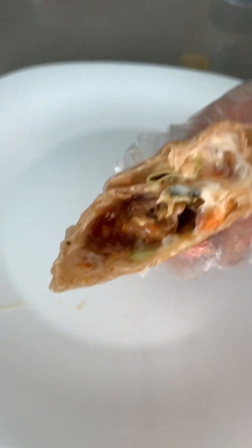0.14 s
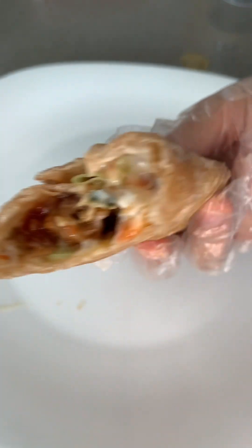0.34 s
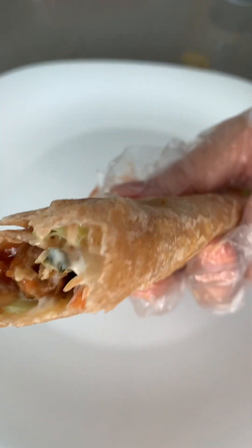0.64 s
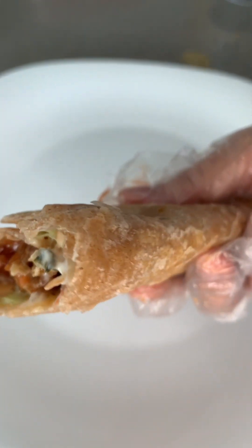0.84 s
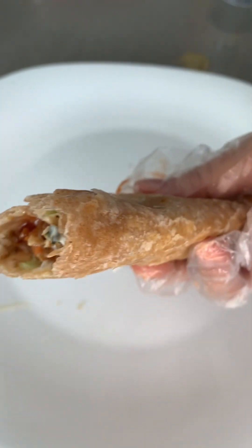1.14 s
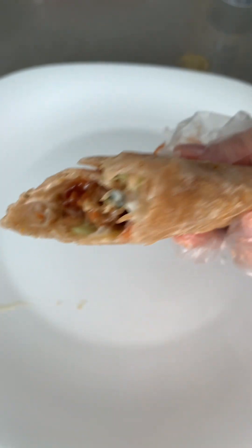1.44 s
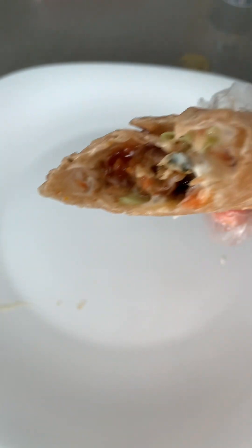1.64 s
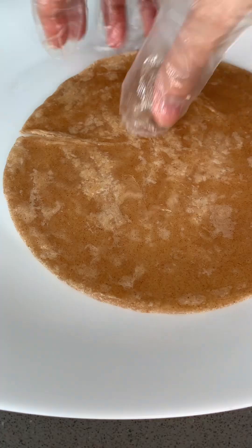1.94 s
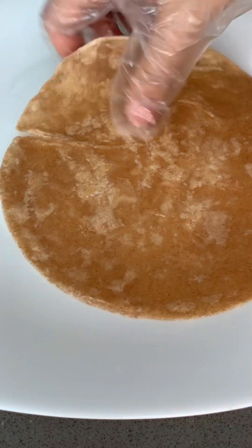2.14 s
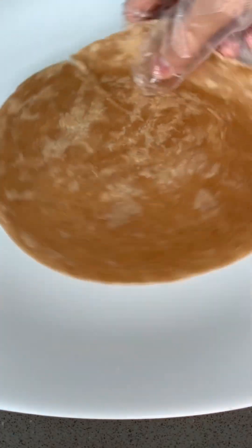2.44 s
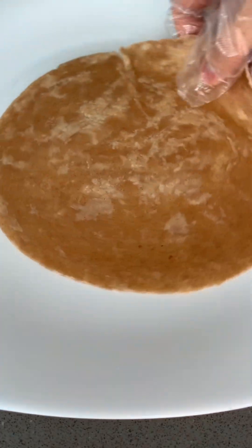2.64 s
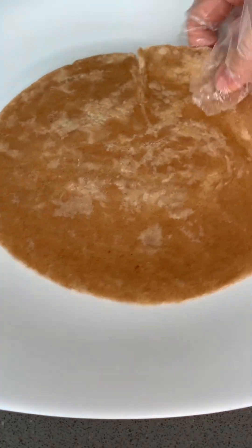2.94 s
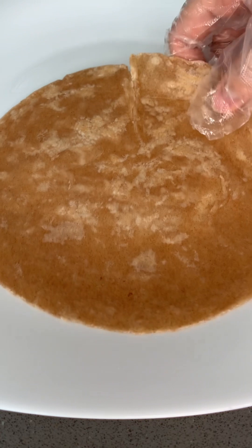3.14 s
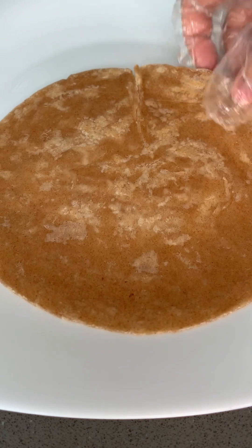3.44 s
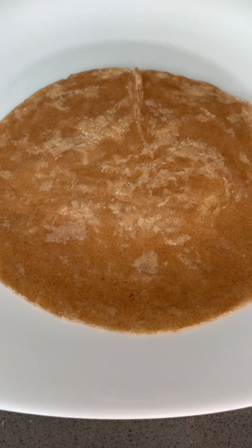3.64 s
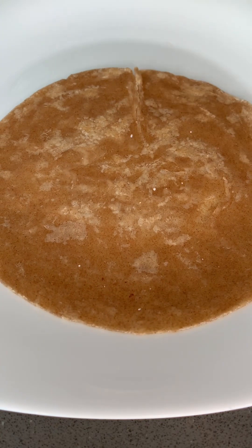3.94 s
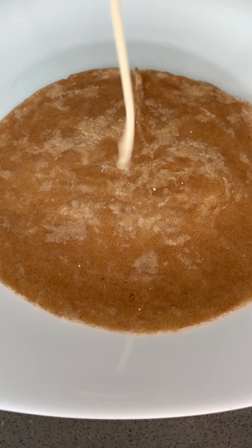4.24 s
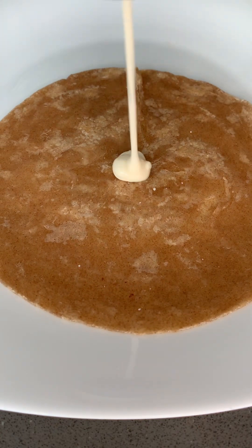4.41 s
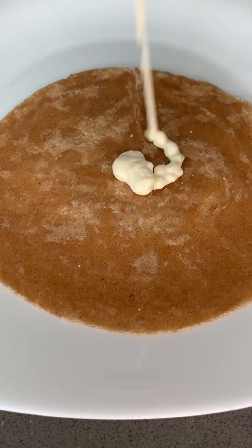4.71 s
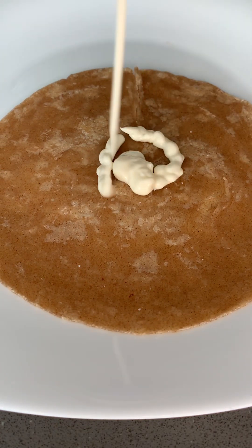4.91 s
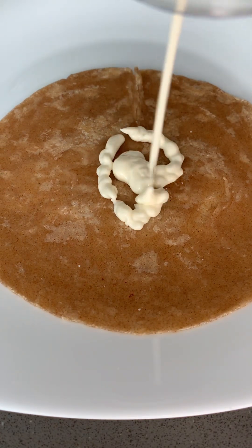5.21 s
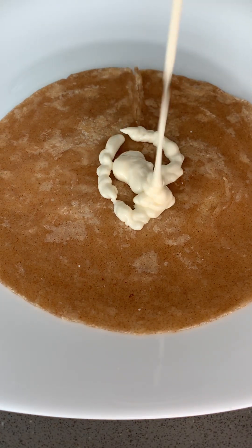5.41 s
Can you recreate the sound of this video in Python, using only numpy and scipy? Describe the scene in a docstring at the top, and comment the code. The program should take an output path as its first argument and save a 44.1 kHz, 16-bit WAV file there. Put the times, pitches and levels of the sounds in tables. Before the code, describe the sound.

Close, dry kitchen recording from above. Thin plastic gloves crackle sharply around a wrap, ease off, then rustle much louder as a flatbread is slid and turned on a plate. A squeeze-bottle cap creaks and pops with a hollow click. Only small sparse crackles remain while sauce pours, until a very short airy squeak from the nozzle. A faint fridge hum and whine lie beneath.

```python
"""Thin plastic gloves rustle and snap while hands turn a wrap, slide a flatbread and squeeze a sauce bottle.
Film is noise of slowly varying level; each crease that gives way is a short burst of coloured noise.
Fingertips bump; a cap creaks and pops as knocks, ringing modes and a gliding tone; a nozzle squeaks at last.
A fridge adds wandering sines and the quiet kitchen adds noise; decaying noise forms the echo.
A phone with two microphone ports listens from above."""
import sys
import numpy as np
from scipy import signal
from scipy.fft import rfft, irfft, next_fast_len
from scipy.io import wavfile
from scipy.ndimage import uniform_filter1d, map_coordinates

SR = 44100
rng = np.random.default_rng(int(sys.argv[2]) if len(sys.argv) > 2 else 0)


def log_audio(samples):
    """Write samples as a 16-bit WAV file to the path given in sys.argv[1]."""
    # one column per channel
    frames = np.atleast_2d(samples).T
    # limit to full scale, then quantise
    limited = np.clip(frames, -1, 1)
    pcm = np.round(limited * 32767).astype(np.int16)
    wavfile.write(sys.argv[1], SR, pcm)


N = 245637

# Colour of crackling glove film: [f/Hz, relative spectral level/dB]
FILM_COLOUR = [(2000, -30), (3500, -11), (4800, -4), (6600, -2), (8300, -1), (9600, 0), (11000, -2),
               (13500, -3), (15500, -2), (17000, -6)]
# Catches of the cap: [t/s, relative level/dB, crack relative to knock/dB]
CAP_CATCHES = [(3.7847, -17.5, -16.5), (3.789, -24.5, -15), (3.7991, -15, -16), (3.81, -32, -7)]


def amp(db):
    """Amplitude is a power of ten of level: 20 dB is a factor of ten."""
    return 10 ** (np.asarray(db) / 20)


def unit(x):
    """Normalization: each signal is scaled to rms 1 along time."""
    return x / np.sqrt(np.mean(x ** 2, -1, keepdims=True) + 1e-20)


def along(points, hz):
    """Interpolation of (f/Hz, value) points on a logarithmic frequency axis."""
    f, v = np.transpose(points)
    return np.interp(np.log(hz + 1), np.log(f + 1), v)


def curves(rows):
    """Linear interpolation in time: one value per sample for each column after t/s."""
    s, *cols = np.transpose(rows)
    return [np.interp(np.arange(N) / SR, s, c) for c in cols]


def wobble(rate):
    """Slow random modulation: a smooth curve through random knots, rate of them a second."""
    knots = rng.standard_normal(int(N * rate / SR) + 4)
    return map_coordinates(knots, [np.arange(N) * rate / SR])


def filtered(x, response):
    """Linear filtering: the spectrum of x is multiplied by a response of frequency."""
    m = next_fast_len(N + SR // 2)
    return irfft(rfft(x, m) * response(np.fft.rfftfreq(m, 1 / SR)), m)[..., :N]


def rush(spectrum, patchy_db):
    """Partial coherence: two noises of one colour and drifting patches share a part set by frequency."""
    # Likeness of the two ports for a spread source: [f/Hz, correlation]
    likeness = [(60, 0.89), (150, 0.84), (300, 0.94), (700, 0.12), (1400, 0.38), (3000, 1), (5000, 1),
                (15000, 1)]
    z = signal.stft(rng.standard_normal((2, N)), nperseg=256)[2]
    field = uniform_filter1d(rng.standard_normal(z.shape[1:]), size=4, axis=0)
    field = uniform_filter1d(field, size=7, axis=1)
    pair = signal.istft(z * amp(patchy_db * field / field.std()), nperseg=256)[1][:, :N]

    def mid_side(hz):
        angle = np.arccos(np.clip(along(likeness, hz), -1, 1)) / 2
        return amp(along(spectrum, hz)) * [np.cos(angle), np.sin(angle)]
    mid, side = filtered(pair, mid_side)
    return unit(np.array([mid + side, mid - side]))


def bursts(s, db, colour_db, width, size=512):
    """Transient noise: coloured puffs, one row each, swell to a peak at s and die exponentially."""
    t = (np.arange(size) - size // 4) / SR / np.reshape(width, (-1, 1))
    shape = np.exp(np.minimum(3.56 * t, -4 * t))
    colour = amp(colour_db(np.fft.rfftfreq(size, 1 / SR)))
    puffs = shape * irfft(rfft(rng.standard_normal((len(s), size))) * colour)
    rows = amp(db)[:, None] * unit(puffs) * np.sqrt(np.mean(shape ** 2, -1, keepdims=True))
    at = np.round(s * SR).astype(int)[:, None] + np.arange(size)
    return np.bincount(at.ravel(), rows.ravel(), N + size)[size // 4:][:N]


def tones(lines, drift, waver_db):
    """Narrow-band oscillation: sines whose phase and strength wander."""
    t = np.arange(N) / SR
    out = 0
    for hz, db in lines:
        strength = amp(db + 2 + waver_db * wobble(6.4))
        out = out + strength * np.sin(2 * np.pi * hz * t + drift * wobble(5.1))
    return out


def kitchen():
    """Superposition: broadband room air, a faint high hiss, and the narrow-band hum and whine of a fridge."""
    # Background levels: [t/s, relative rumble level/dB, relative whine level/dB]
    levels = [(0.0, -57, -84), (0.15, -58.5, -64), (0.54, -59.5, -84), (0.81, -61.5, -65.5),
              (1.24, -61.5, -71.5), (1.57, -58, -62), (1.83, -61.5, -64), (2.02, -51.5, -55),
              (2.14, -58, -57.5), (2.51, -59, -57), (2.98, -61, -60), (3.58, -61.5, -59),
              (3.95, -55.5, -55.5), (4.58, -62, -60.5), (5.57, -60.5, -56.5)]
    # Colour of the room air: [f/Hz, relative spectral level/dB]
    air_colour = [(20, -42), (32, -35), (50, -2), (90, -11), (260, -1), (450, -7.5), (800, -15.5),
                  (1250, -11), (1700, -23.5), (2600, -62)]
    # Colour of a faint high hiss: [f/Hz, relative spectral level/dB]
    hiss_colour = [(1500, -32), (2200, -1), (3000, -10), (5500, 2.5), (8000, -17), (16500, -7)]
    # Compressor lines: [f/Hz, relative level/dB]
    compressor = [(60, -80), (118.4, -71), (188.4, -69.5), (236.5, -67), (279.9, -69.5), (376.8, -75)]
    # Fan motor lines: [f/Hz, relative level/dB]
    fan = [(1184, -12), (1244, -24), (1303.5, -3.5)]
    rumble_db, whine_db = curves(levels)
    air = amp(rumble_db - 0.8 + 0.55 * np.tanh(wobble(6.4))) * rush(air_colour, patchy_db=1.94)
    # a faint high hiss of unsteady level
    high_hiss = amp(-76.5 + 3.8 * np.tanh(2 * wobble(22))) * rush(hiss_colour, patchy_db=2.0)
    hum = tones(compressor, drift=1.51, waver_db=2.0)
    whine = amp(whine_db - 4.5) * tones(fan, drift=0.9, waver_db=2.7)
    return air + high_hiss + hum + whine


def walls(x, stretch):
    """Reverberation: noise dies at a speed set by frequency, independently at each port; stretch prolongs it."""
    # Reverberation at stretch 1: [f/Hz, t60/s]
    decay = [(200, 0.31), (2000, 0.1), (10000, 0.004)]
    hz, t, z = signal.stft(rng.standard_normal((2, SR // 2)), SR, nperseg=256)
    t60 = stretch * along(decay, hz)[:, None]
    tail = signal.istft(z * amp(-60 * t / t60), SR, nperseg=256)[1]
    return signal.fftconvolve(np.atleast_2d(x), tail / np.linalg.norm(tail[0]), axes=1)[:, :N]


def taps():
    """Soft impact excites a limited band: fingers bump bread and plate, the popping cap jolts the counter."""
    # Finger bumps: [t/s, relative level/dB, centre f/Hz]
    bump_rows = [(0.279, -51, 514), (0.32, -48, 960), (0.455, -54, 3500), (0.468, -54, 3400),
                 (0.921, -57.5, 2000), (0.776, -58.5, 988), (1, -53.5, 455), (1.104, -50, 1900),
                 (1.392, -46.5, 1300), (1.873, -48, 1340), (1.951, -50, 764), (1.977, -38.5, 1320),
                 (2.098, -45.5, 1340), (2.153, -48, 1300), (2.463, -47, 1350), (2.541, -53, 1310),
                 (3.059, -56, 1370), (3.694, -65, 1400), (3.998, -48, 1780), (4.033, -51, 2400),
                 (4.172, -55, 2300), (5.187, -48, 1640)]
    s, db, centre_hz = np.transpose(bump_rows)
    bump_colour = lambda hz: -9 * np.log2((hz + 50) / centre_hz[:, None]) ** 2
    bumps = bursts(s + 0.00302, db - 4.0, bump_colour, 0.022, size=2048)
    pop_s = np.array([CAP_CATCHES[2][0]])
    jolt = bursts(pop_s, [-47], lambda hz: -12 * np.log2((hz + 5) / 110) ** 2, 0.035, size=8192)
    return bumps + jolt


def creak():
    """Friction vibration: the hinge rubs in two phase-roughened bands before the cap lets go."""
    # Cap straining: [t/s, lower band f/Hz, relative level/dB]
    strain = [(3.672, 1410, -79), (3.69, 1395, -58), (3.73, 1503, -55), (3.765, 1556, -54),
              (3.779, 1555, -45), (3.785, 1560, -42)]
    hz, db = curves(strain)
    phase = 2 * np.pi * np.cumsum(hz) / SR
    lower = np.sin(phase + 2.3 * wobble(260))
    upper = amp(-3.0) * np.sin(1.4 * phase + 2.9 * wobble(350))
    on = (db > strain[0][2]) * (np.arange(N) / SR < strain[-1][0])
    return on * amp(db + 4.6 * wobble(180)) * (lower + upper)


def cap():
    """Impact and modal decay: each catch knocks, cracks and rings the hollow bottle, whose soft walls flutter."""
    # Colour of the cap's knock: [f/Hz, relative spectral level/dB]
    knock_colour = [(100, -48), (300, -15), (480, 2), (760, 20.5), (1050, -11), (1500, 20.5), (1900, 23),
                    (2300, 13), (2800, 3), (3700, 8), (4500, -19), (5500, -27)]
    # Modes of the bottle: [f/Hz, relative level/dB, t60/s]
    bottle_modes = [(393, -1, 0.63), (408, -12, 0.58), (560, -2.5, 0.25), (770, -11, 0.71),
                    (1136, -10, 0.76), (1510, -8, 0.25), (1710, -17, 0.47), (1760, -15, 0.3),
                    (1910, -9.5, 0.6), (2060, -6, 0.3), (2240, -19, 0.41), (2510, -19, 0.6),
                    (2910, -15, 0.43), (3500, -22, 0.51)]
    s, db, crack_db = np.transpose(CAP_CATCHES)
    knock = bursts(s, db, lambda hz: along(knock_colour, hz), 0.0035)
    crack = bursts(s, db + crack_db, lambda hz: along(FILM_COLOUR, hz), 0.01)
    ring, t = np.zeros(N + SR), np.arange(SR // 2) / SR
    onset = 1 - np.exp(-t / 0.011)
    for at, level in zip(s, db):
        modes = 0
        for hz, mode_db, t60 in bottle_modes:
            flutter = hz / 450 * wobble(76.0)[:len(t)]
            modes = modes + amp(mode_db - 60 * t / t60) * np.sin(2 * np.pi * hz * t + flutter)
        ring[round(at * SR):][:len(t)] += amp(level - 24.0) * modes * onset
    return knock + crack + ring[:N]


def reed(rows, orders_db, pan, jet_db):
    """Reed principle: a fluttering lip chops air into multiples of a gliding pitch, with the jet's hiss."""
    # Hiss of escaping air: [f/Hz, relative spectral level/dB]
    jet_colour = [(60, -37), (220, 2), (500, -31), (1050, -15), (1500, 8), (1900, 2), (3000, -7),
                  (4500, -4), (7000, -21), (16000, -46)]
    hz, db, tilt_db = curves(rows)
    t = np.arange(N) / SR
    on = (t > rows[0][0]) & (t < rows[-1][0])
    phase = 2 * np.pi * np.cumsum(hz[on]) / SR
    out = on * amp(db + jet_db) * rush(jet_colour, patchy_db=5.0)
    for k, order_db in enumerate(orders_db, 1):
        half = amp(along(pan, k * hz[on]) / 2)
        # one suction pulse a cycle, its timing unsteady
        offset = 0.11 * (k - 0.7) * wobble(500)[on] - np.pi / 2
        brightness_db = np.log2(max(k / 1.46, 1)) * tilt_db[on]
        tone = amp(db[on] + 3.5 + order_db + brightness_db) * np.sin(k * phase + offset)
        # the lip closes unevenly, which roughens the overtones
        tone *= amp(0.81 * np.log2(k) * wobble(350)[on])
        out[:, on] += tone * [half, 1 / half]
    return out


def pop():
    """Pressure release: air leaving the cap sounds a brief tone with few overtones, equal at both ports."""
    # Air leaving the cap: [t/s, f/Hz, relative level/dB, overtone tilt/(dB per octave)]
    glide = [(3.780, 533, -55, -1), (3.785, 493, -24.5, -37), (3.792, 445, -22.5, -35),
             (3.797, 392, -16.5, -10.5), (3.803, 389, -19, -13), (3.810, 349, -26.5, 2),
             (3.820, 417, -30, -23), (3.835, 410, -52, -10), (3.845, 385, -81, -12)]
    # Successive multiples of the pitch: [relative level/dB]
    orders = [0, -6, -20]
    return reed(glide, orders, [(400, 0)], jet_db=-8.5)


def squeak():
    """Self-sustained oscillation: air through the nozzle sounds many overtones; the bottle shades the left port."""
    # Air leaving the nozzle: [t/s, f/Hz, relative level/dB, overtone tilt/(dB per octave)]
    glide = [(5.533, 1576, -53, -20), (5.538, 1413, -39, -27), (5.541, 1380, -24, -42),
             (5.544, 1100, -23.5, -3), (5.548, 883, -29, -7), (5.5495, 856, -21.5, 0.5),
             (5.555, 798, -17.5, 0.5), (5.558, 833, -18, 0.5), (5.561, 875, -28, -5.5),
             (5.57, 860, -44, -3)]
    # Successive multiples of the pitch: [relative level/dB]
    orders = [0, 0, -12, -14, -19, -17, -15, -13, -19, -22, -8, -18, -14, -16, -15, -10, -12, -25]
    # Shading by the bottle: [f/Hz, left minus right level/dB]
    shading = [(780, -2), (950, -10), (1150, -2), (1600, -1), (2400, -5), (3300, 1)]
    return reed(glide, orders, shading, jet_db=-9.0)


def creases(s, db, pitch_hz, body_db, width):
    """Buckling: each crease cracks near its pitch in blotchy colour, taps what is held, differs at the ports."""
    # What a crease shakes in the hand: [f/Hz, relative spectral level/dB]
    held_colour = [(300, -44), (1300, -23), (2000, -9.5), (2650, -12), (3350, -6), (4500, -15), (9000, -57)]
    blotch = uniform_filter1d(rng.standard_normal((len(s), 257)), 24, axis=1)

    def crack_colour(hz):
        octaves = np.log2((hz + 100) / pitch_hz[:, None])
        return along(FILM_COLOUR, hz) - 6 * octaves ** 2 + 13 * blotch
    crack = bursts(s, db, crack_colour, width)
    uneven = [[1], [-1]] * bursts(s, db - 29.0, crack_colour, width)  # opposite sign at the two ports
    body_colour = lambda hz: along(held_colour, hz) + 16 * blotch
    return crack + uneven + bursts(s, db + body_db - 1.5, body_colour, 1.95 * width)


def sliding_film(rustle_db, slide_db, calm, fits_db, gap_db):
    """Friction noise: film hisses, sinking by up to gap_db under a calm hand, and slides over food and plate."""
    # Colour of film sliding over food and plate: [f/Hz, relative spectral level/dB]
    plate_colour = [(150, -68), (300, -10), (550, -8.5), (1000, -12.5), (1550, -6.5), (2000, -2.5),
                    (2400, -5), (2750, -11.5), (3300, -5.5), (4100, -9.5), (5000, -6), (9000, -16)]
    grain_db = fits_db + 2.5 * wobble(140)
    hiss = amp(rustle_db - 2.5 - gap_db * calm + grain_db) * rush(FILM_COLOUR, patchy_db=-1.7)
    flutter_db = .8 * wobble(30) + 2.5 * wobble(120)
    slide = amp(slide_db + 0.54 * fits_db + flutter_db) * rush(plate_colour, patchy_db=0.5)
    return hiss, slide


def crease_swarm(rustle_db, slide_db, calm, fits_db, gap_db):
    """Crackling noise: creases at random times, many small and few large, follow the rustle."""
    swarm_db, range_db = -8, 18  # offset from the rustle; spread of the random sizes
    draw = rng.random((5000, 4))
    s = draw[:, 0] * (N - 1) / SR
    at = (s * SR).astype(int)
    size_db = range_db * draw[:, 1] ** 6 + 2.0 * fits_db[at]
    db = rustle_db[at] + size_db + swarm_db - gap_db / 2 * calm[at]
    # the harder the film is pressed on food or plate, the more body a crease has
    body_db = slide_db[at] - rustle_db[at] - 1.0
    return creases(s, db, 4500 * 2.2 ** draw[:, 2], body_db, 0.00037 + 0.00067 * draw[:, 3])


def single_snaps():
    """Sudden release: each loud crease gives way with two weaker neighbours close in time and pitch."""
    # Single creases: [t/s, relative level/dB, nominal pitch f/Hz, body relative to level/dB]
    snap_rows = [(0.004, -32, 9500, -18), (0.0145, -28, 10600, -18), (0.02, -32.5, 9900, -10.5),
                 (0.0321, -29, 9000, -32), (0.0475, -35, 10200, -31), (0.0527, -41, 9500, -20),
                 (0.075, -41, 10000, -20), (0.0879, -31.5, 10330, -29), (0.0927, -40.0, 10000, -23),
                 (0.1134, -35, 10600, -21), (0.124, -32, 9400, -23), (0.1515, -30, 10900, -16),
                 (0.1592, -33, 11200, -29), (0.1627, -36, 11000, -15), (0.1745, -39, 9500, -20),
                 (0.179, -34, 8800, -10), (0.185, -41, 9500, -20), (0.2183, -48, 10600, -12),
                 (0.2253, -35, 11400, -21), (0.229, -33.5, 10500, -24), (0.2382, -33, 9800, -20),
                 (0.2457, -49, 8800, -16), (0.2723, -48, 10200, -33), (0.28, -32, 9500, -16),
                 (0.294, -33, 10500, -23), (0.3053, -34, 9500, -17), (0.31, -32, 10200, -23),
                 (0.3214, -30, 10400, -20), (0.335, -41, 10500, -14), (0.356, -40, 8900, -18),
                 (0.363, -27.5, 8750, -31), (0.3693, -45, 6200, -15), (0.3804, -32, 9300, -28),
                 (0.385, -39, 10600, -9.5), (0.3886, -36, 10400, -18), (0.3977, -34, 8200, -10),
                 (0.412, -43, 6900, -12), (0.4255, -46, 10400, -27), (0.4307, -51.0, 9000, -14),
                 (0.4543, -53.5, 4200, 10), (0.4761, -53.0, 6900, -5), (0.482, -55, 6300, 4.5),
                 (0.531, -55, 8300, -3), (0.5367, -51, 11000, -18), (0.556, -51, 10300, -21),
                 (0.56, -42, 11900, -20), (0.5738, -62, 9700, -23), (0.5865, -42, 9600, -25),
                 (0.5988, -42, 9600, -24), (0.6057, -55, 12400, -21), (0.614, -48, 9000, -30),
                 (0.617, -40, 8200, -17), (0.6366, -36, 9000, -20), (0.648, -37.5, 9700, -18),
                 (0.652, -39, 9400, -27), (0.6626, -43, 9800, -10), (0.67, -44, 10100, -11),
                 (0.6826, -39, 9400, -16), (0.6957, -37, 12200, -15), (0.7129, -54, 7700, -22),
                 (0.7381, -51, 8000, -28), (0.7476, -46, 8900, -26), (0.7755, -35.5, 9600, -20),
                 (0.7868, -40, 9300, -18), (0.792, -47.5, 10300, -22), (0.8011, -37.5, 9100, -20),
                 (0.8178, -50, 8500, -28), (0.835, -41, 10300, -29), (0.8455, -36, 10400, -35),
                 (0.852, -36, 8400, -12.5), (0.8653, -41, 9100, -13), (0.8764, -49.0, 9400, -28),
                 (0.9023, -37, 12100, -20), (0.911, -54, 8200, -23), (0.918, -51, 8400, -2),
                 (0.936, -46, 9300, -18), (0.9394, -43, 9300, -29), (0.946, -43, 9100, -19),
                 (0.954, -38, 9900, -16), (0.974, -38, 9300, -21), (1.0012, -36, 9100, -12.5),
                 (1.0091, -52.5, 7800, -22), (1.0158, -41, 10400, -19), (1.0358, -40, 11100, -30),
                 (1.04, -61, 7900, -18), (1.062, -38.5, 9700, -24), (1.0675, -52, 6670, -26),
                 (1.096, -45, 8700, -12), (1.1259, -48, 10600, -8), (1.135, -51, 9200, -4),
                 (1.1519, -57, 6600, -22), (1.1878, -61, 8300, -7), (1.1995, -57, 5300, -1),
                 (1.2447, -36.5, 10700, -26), (1.2508, -49, 10700, -10), (1.26, -49, 9700, -20),
                 (1.2865, -49, 9900, -27), (1.3006, -55, 6800, -13), (1.3158, -57, 10600, -28),
                 (1.3504, -38.5, 8400, -14), (1.3682, -47, 9000, -12), (1.3766, -32, 7200, -13),
                 (1.3904, -27, 8900, -29), (1.4093, -31.5, 6700, -8), (1.4194, -33, 8500, -18),
                 (1.4327, -39, 10400, -23), (1.4399, -31, 10000, -29), (1.4466, -30, 10700, -29),
                 (1.464, -37, 9200, -19), (1.4762, -37, 11000, -11), (1.5012, -35, 11800, -25),
                 (1.538, -35, 10300, -19), (1.5569, -40, 9700, -14), (1.5666, -38, 11000, -15),
                 (1.595, -33.5, 10600, -15), (1.6497, -39, 8600, -12), (1.6686, -52, 9400, -12),
                 (1.7345, -44, 6000, -1), (1.7792, -31.5, 9200, -8), (1.795, -32, 9050, -19),
                 (1.803, -33, 10800, -26), (1.849, -32.5, 6060, -13), (1.8749, -43, 8700, -21),
                 (1.884, -36.5, 7600, -4), (1.8914, -34, 8700, -9), (1.9044, -32, 10100, -17),
                 (1.925, -35.5, 10300, -23), (1.953, -31, 8500, -25), (1.9615, -21, 8600, -19),
                 (2.04, -28, 9200, -26), (2.2004, -25, 8800, -23), (2.2203, -31, 8000, -22),
                 (2.2618, -30, 7700, -24), (2.2751, -35, 9400, -12), (2.2985, -25, 6900, -12.5),
                 (2.323, -29, 8900, -11), (2.343, -28, 8700, -13), (2.358, -34, 9200, -12),
                 (2.371, -25.5, 8200, -8.5), (2.4194, -25.5, 9500, -21), (2.4554, -26, 9200, -18),
                 (2.4884, -21, 9450, -13.5), (2.5053, -40, 8900, -22), (2.526, -33.0, 8700, -15),
                 (2.5443, -28, 9300, -8), (2.5576, -23, 10200, -16), (2.571, -26, 9400, -15),
                 (2.5947, -27, 9000, -26), (2.619, -33, 10400, -12), (2.656, -37, 10800, -26),
                 (2.674, -45, 10600, -23), (2.6891, -43, 7500, -15), (2.6997, -45, 11800, -24),
                 (2.7117, -39, 10400, -11), (2.7505, -28.5, 8100, -9.5), (2.7848, -35, 10600, -21),
                 (2.8068, -37, 8600, -30), (2.8112, -38, 9500, -15), (2.8179, -38, 11700, -18),
                 (2.8291, -34, 8000, -12), (2.842, -34, 8600, -27), (2.8458, -35.5, 7500, -8),
                 (2.8547, -45, 8300, -3), (2.8687, -34, 8400, -9), (2.8721, -46.0, 7600, -15),
                 (2.878, -34, 11400, -14), (2.8987, -34, 8900, -21), (2.9068, -37.5, 7500, -6),
                 (2.9183, -46, 8800, -24), (2.9342, -34, 9600, -13), (2.949, -32.5, 9100, -10),
                 (2.9576, -29, 9900, -12), (2.9725, -30, 8700, -15), (2.9777, -29, 9400, -16),
                 (2.99, -34, 9000, -9), (3.024, -44, 8300, -24), (3.0279, -39, 8400, -28),
                 (3.054, -31.0, 10900, -18), (3.1143, -35, 7400, 3.5), (3.1294, -36, 6700, 4),
                 (3.1436, -40.5, 6600, 4.5), (3.1643, -50, 8200, -20), (3.181, -44.5, 6900, 1.5),
                 (3.1895, -39, 7200, -5), (3.1936, -44.5, 9500, -21), (3.2033, -36, 8800, -19),
                 (3.2231, -48.0, 9300, -9), (3.2343, -43, 8000, -11), (3.2435, -42, 8800, -9),
                 (3.252, -42, 9600, -7), (3.264, -38, 10600, -4), (3.2813, -36, 6600, 1.5),
                 (3.3156, -39, 7100, -1), (3.321, -31, 7600, -10), (3.3288, -33.5, 6200, -3),
                 (3.3387, -28.5, 7900, -6), (3.3654, -31, 9500, -10), (3.377, -36, 11600, -23),
                 (3.398, -49, 6500, -11), (3.413, -49, 6900, -11), (3.4836, -50, 9400, -19),
                 (3.4942, -39, 9200, -18), (3.5525, -37.5, 9200, -24), (3.5637, -40, 7500, -16),
                 (3.5689, -37, 11300, -26), (3.5754, -35, 9000, -22), (3.5805, -42, 8400, -18),
                 (3.5865, -36, 10500, -24), (3.5973, -46, 9400, -21), (3.6288, -31.5, 7800, -9.5),
                 (3.6413, -26, 9100, -25.5), (3.6564, -38, 9000, -23), (3.671, -41, 8800, -19),
                 (3.698, -47, 5200, -8), (3.73, -47, 6900, -3), (3.7671, -53, 5700, -2),
                 (3.825, -29, 8800, -20), (3.8868, -46, 8750, -28), (3.9166, -65, 6000, -8),
                 (3.9838, -53, 9800, -14), (3.9891, -51, 8200, -15), (4.0361, -53, 7900, -11),
                 (4.048, -43, 9100, -23), (4.0738, -46.0, 11400, -23), (4.1046, -37, 10500, -9),
                 (4.1234, -44, 5700, -6), (4.145, -46.5, 7340, -1), (4.1545, -39, 7150, -18),
                 (4.1586, -51, 6800, -20), (4.1695, -48, 9550, -7), (4.211, -44, 6500, -25),
                 (4.22, -49, 8100, -12), (4.227, -43, 7000, -14), (4.2373, -41.5, 8100, -11),
                 (4.2407, -51, 7000, -6), (4.25, -48, 8000, -13), (4.275, -56, 4000, 5.5),
                 (4.2827, -58, 9100, -24), (4.2978, -44.5, 6450, -5), (4.3104, -40, 7300, -17),
                 (4.3216, -33, 5860, -20), (4.337, -40, 5960, -18), (4.361, -52.0, 8700, -9),
                 (4.3715, -46, 6100, -8), (4.399, -48, 7300, -20), (4.4075, -62, 6900, -14),
                 (4.4113, -42, 5560, -16), (4.451, -52.5, 6300, 2), (4.463, -54, 5600, -17),
                 (4.4731, -58, 7300, -11), (4.527, -44, 5500, -13), (4.5323, -56, 5500, 3),
                 (4.5466, -51.5, 6250, -11), (4.597, -68, 4200, 9), (4.6506, -60, 5530, -25),
                 (4.6687, -52, 4500, -8), (4.6724, -57.5, 5900, 6), (4.6857, -57, 5800, -3),
                 (4.7042, -53, 5700, -13), (4.7275, -58, 7800, -10), (4.7363, -63, 6800, -15),
                 (4.742, -51.5, 9250, -17), (4.758, -60, 6000, -21), (4.7721, -64.5, 5700, -14),
                 (4.7993, -50, 10700, -6), (4.8048, -58.5, 6500, -6), (4.8159, -62, 6400, 2),
                 (4.8422, -65, 3800, 9), (4.8703, -50, 5900, -9), (4.893, -62, 5000, 1),
                 (4.901, -44.5, 9400, -11), (4.919, -52, 7900, -25), (4.9534, -53, 8700, -17),
                 (4.962, -51.5, 7300, -2), (4.98, -56, 10300, -5), (4.9926, -62, 4900, 1),
                 (5.023, -57, 5600, 1.5), (5.034, -57, 6100, -3), (5.0433, -62, 6500, -6),
                 (5.0768, -51, 8500, -22), (5.082, -48.5, 7900, -25), (5.1228, -63, 14300, -29),
                 (5.1411, -43, 10600, -17), (5.1666, -49, 7900, -3), (5.1853, -36, 6200, -19),
                 (5.2291, -44, 7650, -24), (5.2648, -39, 8700, -12), (5.3128, -70, 5700, -17),
                 (5.3247, -59, 5600, -14), (5.3289, -45, 5370, -17), (5.3347, -53.5, 5100, 1),
                 (5.3598, -41.5, 6400, -12), (5.3773, -51, 7950, -7), (5.4051, -60, 7700, -26),
                 (5.4424, -50, 7200, -8), (5.456, -58.5, 9500, -25), (5.479, -45, 6900, -11),
                 (5.5304, -32, 11200, -25)]
    width_ms, log_scatter, snap_db = 1.68, 0.1, -2  # median burst width, its scatter, gain
    fold_ms, fold_db = (-1.5, 2.5), (-14, -5)  # ranges of a neighbour's time and level relative to the snap
    s, db, hz, body_db = np.transpose(snap_rows)
    width = width_ms / 1000 * np.exp(log_scatter * rng.standard_normal(len(s)))
    snaps = creases(s, db + snap_db, hz, body_db, width)
    for late, loud, high in rng.random((len(s), 2, 3)).transpose(1, 2, 0):
        fold_s = s + np.interp(late, [0, 1], fold_ms) / 1000
        level_db = db + snap_db + np.interp(loud, [0, 1], fold_db)
        snaps += creases(fold_s, level_db, hz * 2 ** (high - .5), body_db, width)
    return snaps


def gloves():
    """Stick-slip: film yields in fits that are deeper in a calm hand; returns spread and point sound."""
    # Glove film: [t/s, relative rustle level/dB, relative level of slide over food and plate/dB]
    hand_rows = [(0.0, -48, -62), (0.2, -52, -64), (0.31, -53.5, -71), (0.4, -54, -64), (0.51, -68, -67.5),
                 (0.64, -54, -84), (0.73, -60, -84), (0.79, -56.5, -79), (1.1, -57, -74), (1.2, -70, -80),
                 (1.33, -59.5, -76), (1.4, -43, -56), (1.55, -53.5, -66), (1.79, -44, -52.5),
                 (1.85, -46.5, -55), (1.858, -55, -76), (1.885, -47, -58), (1.935, -42, -52),
                 (1.95, -31.5, -43), (2.1, -38, -42.5), (2.18, -32.5, -43), (2.27, -41, -48.5),
                 (2.375, -39.5, -48.5), (2.41, -40.5, -46), (2.5, -39, -44.5), (2.72, -45, -51.5),
                 (2.85, -53, -61), (2.96, -41.5, -47.5), (3.14, -45, -52.5), (3.22, -55.5, -64.5),
                 (3.3, -44.5, -47.5), (3.56, -50.5, -54), (3.668, -53, -69), (3.678, -61, -74),
                 (3.7, -58.5, -59), (3.82, -53, -58), (3.96, -60.5, -64.5), (4.03, -47, -59.5),
                 (4.1, -65, -69), (4.3, -56, -69), (4.5, -69, -79.5), (5.13, -78, -79.5), (5.2, -44.5, -64),
                 (5.3, -56.5, -80), (5.43, -69, -92), (5.5, -54, -58.5), (5.57, -51, -49)]
    # Shelf on the rustle's treble: [t/s, gain well above 8 kHz/dB]
    sheen = [(0, 1), (1.3, -3.5), (1.5, 0), (2.8, 3.5), (3.6, -0.5), (4.05, 0.5), (4.3, -5), (5.1, 0),
             (5.19, -17), (5.4, -21), (5.5, 4.5)]
    calm_db, busy_db = -65.5, -51.5  # rustle of a resting hand (gappy crackle) and a busy one (even hiss)
    fits_depth_db, gap_db = (2, 6), 10  # fits of a busy and a calm hand; sinking of the hiss when calm
    rustle_db, slide_db = curves(hand_rows)
    calm = np.clip((busy_db - rustle_db) / (busy_db - calm_db), 0, 1)
    fits_db = np.interp(calm, [0, 1], fits_depth_db) * np.tanh(wobble(60))
    hiss, slide = sliding_film(rustle_db, slide_db, calm, fits_db, gap_db)
    swarm = crease_swarm(rustle_db, slide_db, calm, fits_db, gap_db)
    shelf = amp(curves(sheen)[0]) - 1
    top = lambda x: shelf * filtered(x, lambda hz: 1 / (1 + (8000 / (hz + 1)) ** 6))
    return hiss + top(hiss) + slide, swarm + top(swarm) + single_snaps()


def scene():
    """Superposition: direct sounds add to their reverberation and to the kitchen's background."""
    spread, points = gloves()
    points = points + taps()
    bottle = pop() + squeak() + cap() + creak()
    echo = amp(-8.5) * walls(points, stretch=1.0) + amp(-22.5) * walls(bottle, stretch=2.04)
    return spread + points + bottle + echo + kitchen()


def record(dry):
    """Two-port reception: level and phase differ by frequency; the band ends just below 17 kHz."""
    # Level difference of the ports: [f/Hz, left minus right level/dB]
    tilt = [(60, -0.5), (250, 2), (700, -1.5), (1300, -0.5), (1800, -1), (2350, -3.5), (3000, -0.5),
            (4400, 1), (15000, -1)]
    # Phase difference of the ports: [f/Hz, lead of the left port/rad]
    lead = [(0, 0), (900, -1.8), (1380, .2), (3500, 1.6), (4800, 3.14), (17300, 22.0)]
    # Fall of the top treble: [f/Hz, gain/dB]
    edge = [(15700, 0), (16000, -30), (16900, -40)]
    top_hz = 16950  # nothing passes from here up

    def ports(hz):
        half = amp(along(tilt, hz) / 2) * np.exp(.5j * np.interp(hz, *np.transpose(lead)))
        return np.array([half, 1 / half]) * amp(along(edge, hz)) * (hz < top_hz)
    return filtered(dry, ports)


dry = scene()
out = record(dry)
log_audio(out)
```